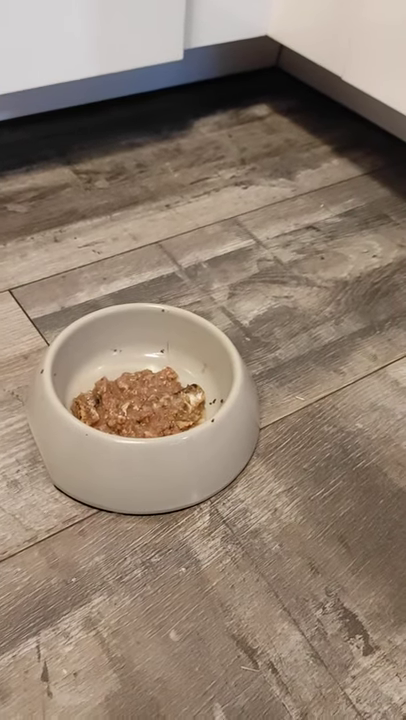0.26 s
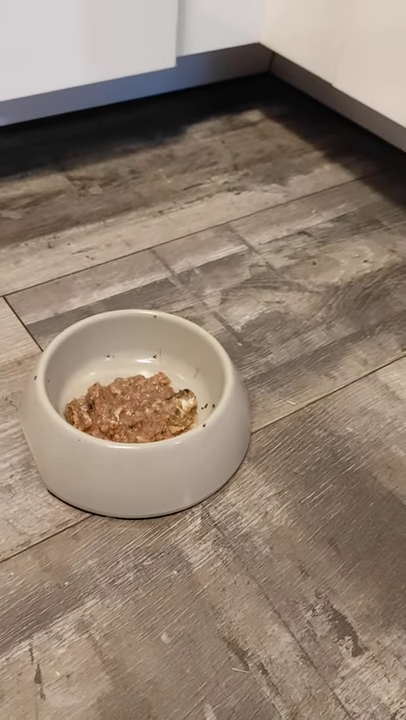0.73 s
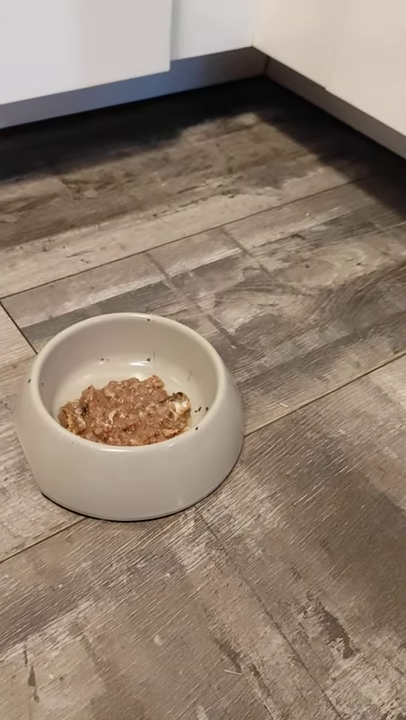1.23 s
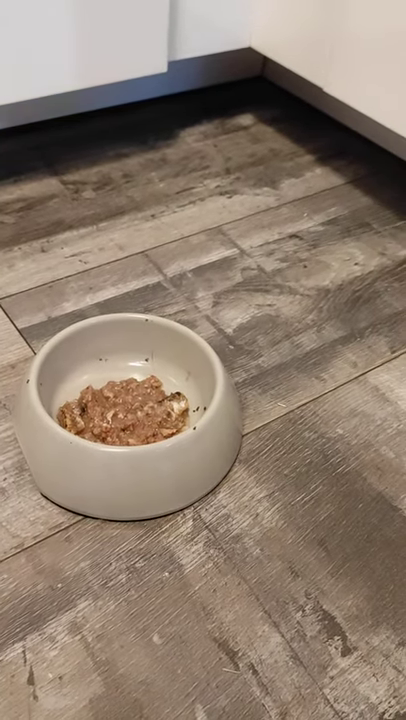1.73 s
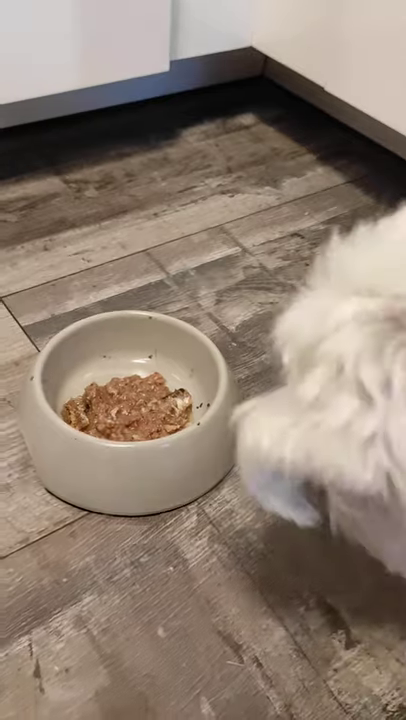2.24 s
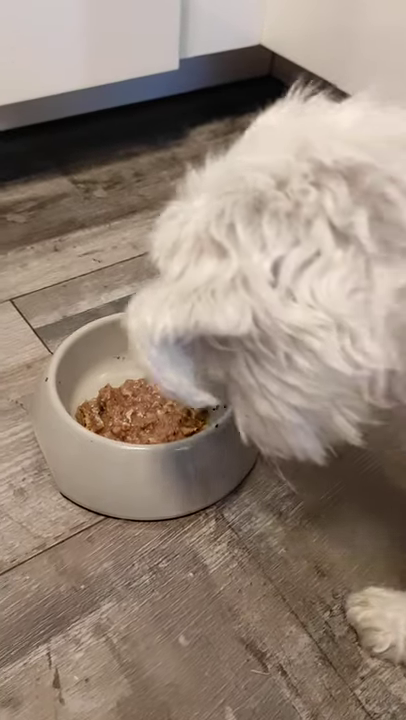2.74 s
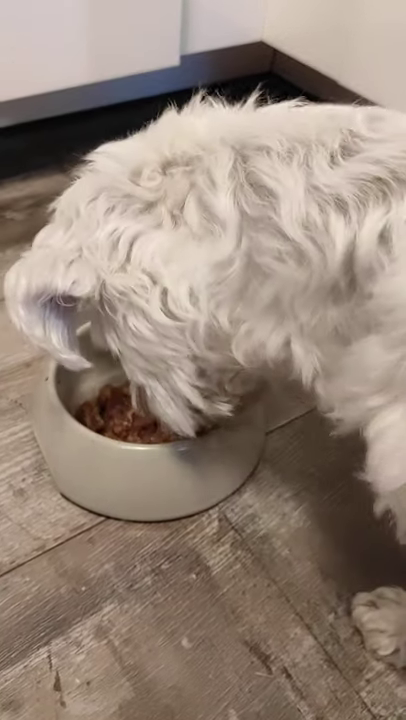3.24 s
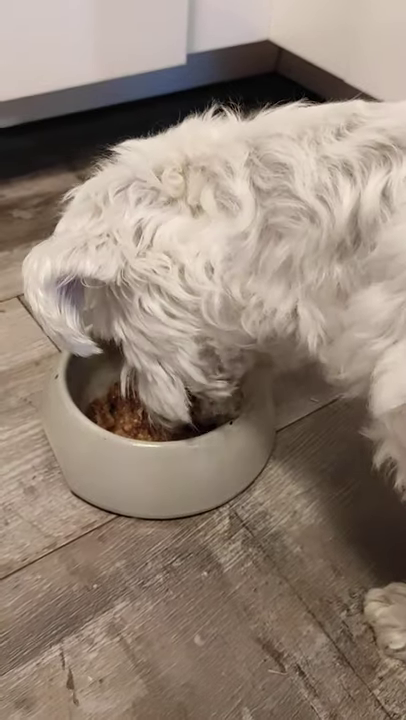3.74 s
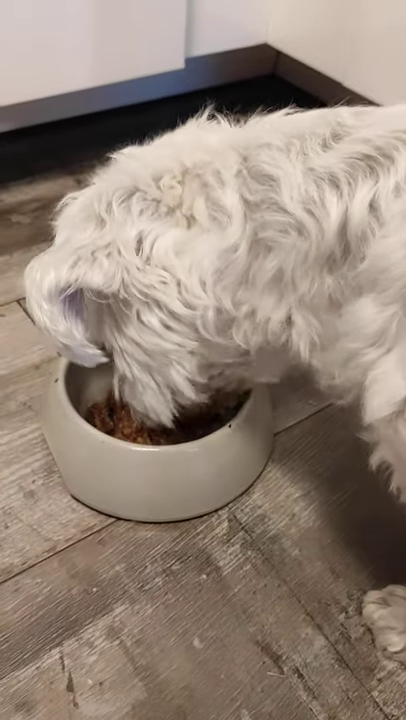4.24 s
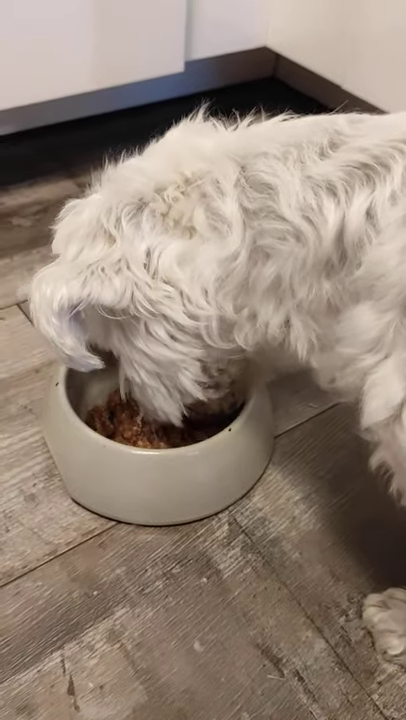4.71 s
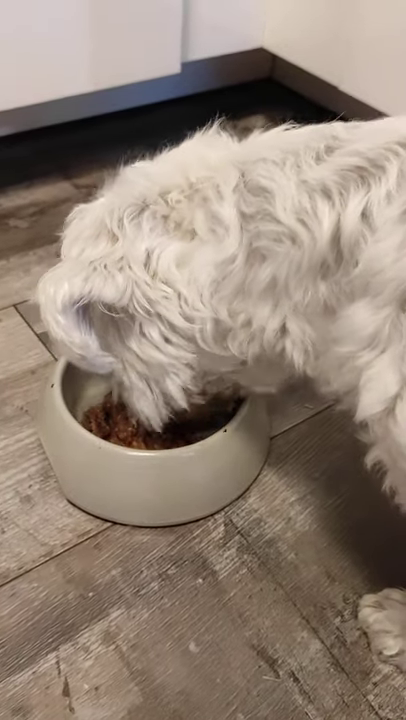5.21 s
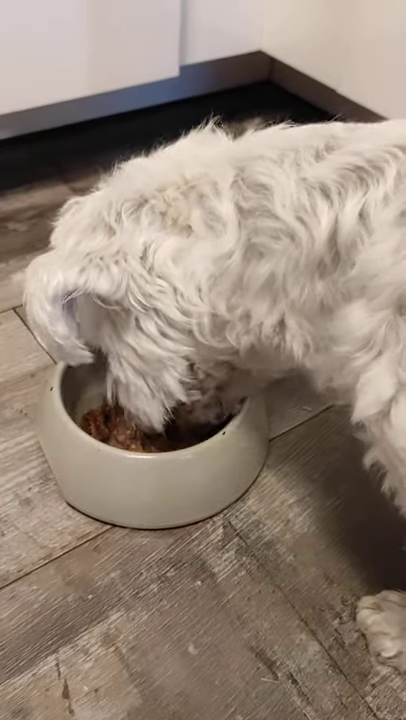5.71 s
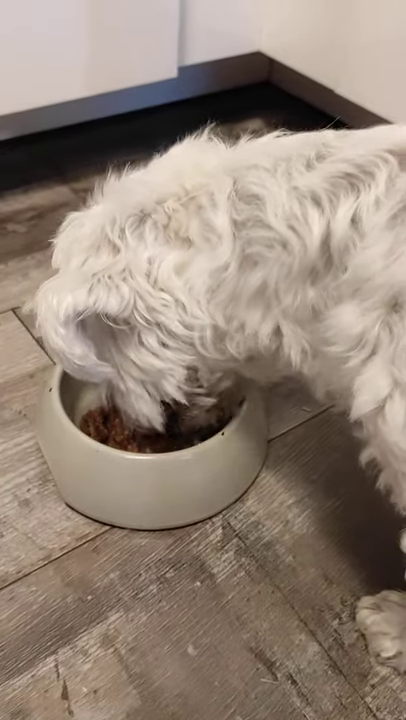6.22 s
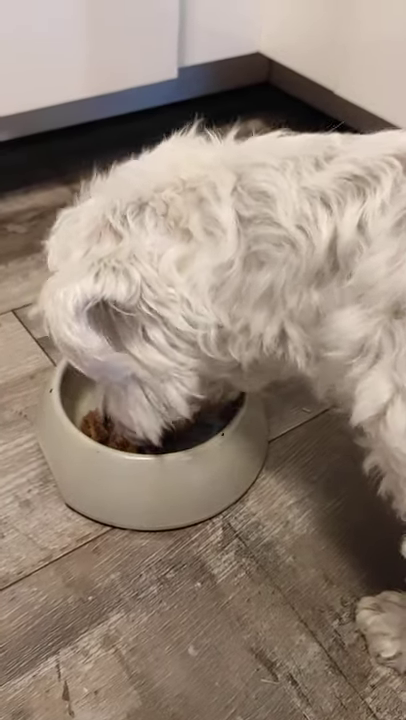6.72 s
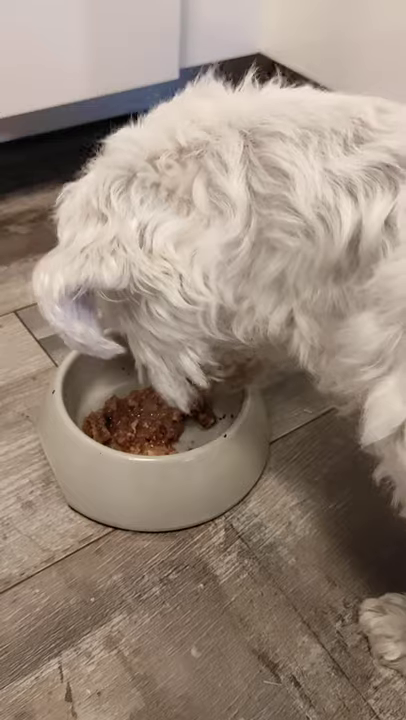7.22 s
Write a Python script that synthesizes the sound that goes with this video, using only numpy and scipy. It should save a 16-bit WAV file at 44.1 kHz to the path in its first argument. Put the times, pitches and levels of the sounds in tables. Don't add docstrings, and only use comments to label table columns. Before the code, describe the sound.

Bright claw ticks, some strong and some barely there, mix with brief gritty skids as a dog walks to its bowl, drifting from right toward left. A few soft nosing sounds and a first taste follow, then quieter, quick, irregular wet mouth clicks with little air pops and a low double bump late on. Quiet indoor hum, hard reflective room, handheld phone close to the muzzle.

```python
import sys
import numpy as np
from scipy import signal
from scipy.fft import rfft, irfft
from scipy.io import wavfile
from scipy.ndimage import uniform_filter1d

SR = 44100
rng = np.random.default_rng(int(sys.argv[2]) if len(sys.argv) > 2 else 0)


def wav_out(sig):
    wavfile.write(sys.argv[1], SR, np.round(np.clip(np.atleast_2d(sig).T, -1, 1) * 32767).astype(np.int16))


def rack_gain(trim_db):
    fader = np.asarray(trim_db, float)
    return 10 ** (fader / 20)


N = 328986
T = np.arange(N) / SR
HZ = np.maximum(np.arange(N // 2 + 1) * SR / N, 1)
SWELL_RANGE_DB = 38.5


def unit(x):
    return x / np.sqrt(np.mean(x ** 2))


def shape(points):
    hz, value = np.transpose(points)
    return np.interp(np.log(HZ), np.log(hz), value)


def peak(hz, width_hz):
    return 1 / np.sqrt(1 + ((HZ - hz ** 2 / HZ) / width_hz) ** 2)


def colour(x, gain):
    return irfft(rfft(x) * unit(gain), N)


def crackle(spread_db, size):
    strength = np.minimum(rng.exponential(size=N // size + 1), 5)
    gain = np.repeat(rack_gain(spread_db * strength), size)[:N]
    return unit(uniform_filter1d(gain, size=size // 2) * rng.standard_normal((2, N)))


def swells(events):
    level_db = []
    for s, db, swell_s, fade_s in events:
        distance = np.maximum((s - T) / max(swell_s, 0.002), (T - s) / max(fade_s, 0.002))
        level_db.append(db - SWELL_RANGE_DB * distance)
    return np.sum(rack_gain(level_db), axis=0)


def ticks(events, rise_s, layer_db):
    hold_stretch = 1.77
    out = np.zeros((3, 2, N))
    grain = crackle(2.2, size=36)
    for s, db, knock_db, body_db, pan_db, length_ms in events:
        first = int((s - rise_s) * SR)
        span = slice(first, first + 1500)
        age = T[span] - s + rise_s
        hold_s = hold_stretch * max(length_ms, 0.2) / 1000
        rise = np.minimum(age / rise_s, 1) ** 2
        fall = np.exp(-(np.maximum(age - rise_s, 0) / hold_s) ** 2)
        burst = rise * fall * grain[:, span]
        energy = np.sum(burst ** 2, axis=1, keepdims=True)
        burst /= np.sqrt(energy / (length_ms * SR / 1000))
        burst *= rack_gain(db + np.array([[pan_db], [-pan_db]]) / 2)
        shares = rack_gain(np.add(layer_db, [0, knock_db, body_db]))
        out[:, :, span] += shares[:, None, None] * burst
    return out


def voiced(layers, spectrum, knock_hz):
    top, knock, body = layers
    split_hz, knock_width_hz = 6000, 2060
    below = 1 / (1 + (HZ / split_hz) ** 8)
    tick = rack_gain(shape(spectrum))
    sharp = colour(top, tick * (1 - below)) + colour(body, tick * below)
    return sharp + colour(knock, peak(knock_hz, knock_width_hz) ** 2)


def pops(events, glide, attack_s):
    out = np.zeros(N)
    for s, db, hz, t60_s in events:
        span = slice(int(s * SR) + 1, int(s * SR) + SR // 4)
        age = T[span] - s
        turns = hz * age * (1 + glide * np.minimum(age / t60_s, 1))
        decay = rack_gain(db - 60 * age / t60_s)
        out[span] += decay * np.minimum(age / attack_s, 1) * np.sin(2 * np.pi * turns)
    return out * rack_gain([[3], [3]])


# loudest_s, peak_db, body_minus_top_db, rattle_ms
CLAW_TICKS = [(0.0401, -15.5, -6, 0.75), (0.0448, -42, 3, 0.83), (0.054, -21.5, -6, 1.15),
              (0.3408, -21.5, -16.5, 2.5), (0.376, -24, -13, 4.5), (0.607, -25.5, -8, 4.2),
              (0.8118, -21.5, -9, 3), (0.815, -27, -11, 2.3), (0.8424, -16, -9.5, 5.2),
              (0.999, -24.5, -12, 3.1), (1.246, -37.5, -12, 2.3), (1.264, -40.5, -6, 3.3),
              (1.3682, -19, -14.5, 1.5), (1.4689, -37.5, -4.5, 1.6), (1.5325, -32.5, -10, 2.5),
              (1.688, -33, -5, 1.87), (1.846, -26.5, -12, 2.5), (1.9927, -40, -4, 5),
              (2.016, -37, -13, 2.7), (2.0487, -23, -11, 5), (2.1585, -31, -20, 3.6),
              (2.6392, -27, -12.5, 2.3), (2.8632, -17.5, -22, 1.3), (2.901, -33.5, -9, 1.9),
              (3.1929, -27, -5.5, 2.9), (3.2105, -20, -12, 1.66), (3.583, -50, 3.5, 3.5),
              (3.6305, -38, -24, 2.4), (3.7611, -21, -13.5, 2.9), (3.932, -39, -24, 2.6)]
# time_s, left_minus_right_db
WALK_PAN = [
    (0.0, -2.5),
    (1.4, 2),
    (2.0, 4.5),
    (3.2, 2),
    (3.9, 8),
]


def claw_ticks():
    usual_db, knock_db, knock_loss_per_db = -28, -18, 0.42
    when_s, pan_db = np.transpose(WALK_PAN)
    events = []
    for s, db, body_db, rattle_ms in CLAW_TICKS:
        knock = knock_db - knock_loss_per_db * (db - usual_db)
        events.append((s, db, knock, body_db, np.interp(s, when_s, pan_db), rattle_ms))
    return ticks(events, rise_s=0.0012, layer_db=(-11, -3, -8))


# loudest_s, level_db, swell_s, fade_s, body_minus_top_db
SKIDS = [(0.038, -53, 0.0092, .012, -9), (0.02, -50, 0.15, 0.16, -5), (0.204, -43.5, 0.13, 0.12, -1),
         (0.335, -40, 0.01, 0.12, -8), (0.53, -34.5, 0.061, 0.18, -4.5), (0.6, -43.5, 0.14, 0.048, -1.5),
         (0.734, -49, 0.037, .025, 5), (1.06, -46.5, 0.058, 0.12, -4), (1.179, -37.5, 0.06, .03, 1),
         (1.368, -36.5, 0.021, 0.0065, 2), (1.866, -45.5, 0.035, 0.067, 1.5),
         (2.237, -45.5, 0.13, 0.0094, 1.5), (2.39, -32, .023, 0.058, -4.5), (2.657, -55, .012, .025, -11),
         (3.05, -51, 0.084, 0.12, -0.5), (3.58, -66.5, 0.28, 0.1, 4), (3.778, -45, .01, 0.03, -18)]


def claw_skids():
    top = swells([row[:4] for row in SKIDS])
    body = swells([(s, db + body_db, swell_s, fade_s) for s, db, swell_s, fade_s, body_db in SKIDS])
    level = rack_gain([-4, -14.5, -6])[:, None, None] * np.array([top, top, body])[:, None]
    fine, coarse = crackle(3.05, size=50), crackle(3.5, size=130)
    return level * np.array([fine, fine, coarse])


# freq_hz, density_db_per_hz
CLAW_SPECTRUM = [(1290, -48), (2200, -11), (3330, -5.5), (4000, -1.5), (4380, -1), (4960, 0), (6010, -5.5),
                 (8300, -5), (9970, -22.5), (11800, -30), (16000, -36)]


def feet():
    return voiced(claw_ticks() + claw_skids(), CLAW_SPECTRUM, knock_hz=1270)


# start_s, peak_db, pitch_hz, t60_s
BOARDS = [(0.377, -57, 726, 0.038), (0.811, -40, 1456, 0.022), (0.845, -45, 1370, 0.031),
          (2.051, -49.5, 1168, 0.028), (2.233, -50.5, 1050, 0.025), (2.373, -48, 900, 0.015),
          (2.641, -57, 730, 0.036), (2.862, -48.5, 1090, 0.019), (3.195, -50, 1064, 0.03),
          (3.214, -46, 746, 0.015), (3.762, -49.5, 880, 0.028), (3.934, -54.5, 530, 0.05)]


def floor_boards():
    return pops(BOARDS, glide=0.06, attack_s=0.00017)


# loudest_s, peak_db, cavity_minus_top_db, body_minus_top_db
SMACKS = [(4.1068, -46, -2, -3), (4.2857, -50, 7, -12), (4.4284, -37, -34, -8), (4.598, -46.5, 5, 0),
          (4.608, -46, 4, -5), (4.906, -38, -21, -25), (4.9458, -44.5, -8, -11), (4.9745, -44, -15, 5),
          (5.136, -48, 4, 5.5), (5.188, -48, 6, -20), (5.2003, -44, -2, -24), (5.415, -46, 1, -1.5),
          (5.4758, -44, -19, 6), (5.48, -44.5, 1, 6), (5.572, -33.5, -4.5, -36), (5.7507, -48, -18, 5.5),
          (5.881, -33.5, -10.5, 2.5), (5.917, -37, -9, -22), (5.9841, -40, -4, -29),
          (6.0159, -41.5, 1, -28), (6.156, -39.5, -24, -11), (6.2397, -47.5, 2, 1), (6.353, -41, -10, -40),
          (6.6269, -39.5, -18, -22), (6.6752, -30.5, -30, -44), (6.6813, -34, -5.5, -41),
          (6.714, -33, -29, -42), (6.8413, -48, 7, 1.5), (7.044, -41.5, -11, -23), (7.1801, -34.5, -15, 0)]
# loudest_s, peak_db
LICKS = [(4.085, -54), (4.1654, -55), (4.5027, -57), (4.528, -56), (4.5677, -57), (4.337, -56),
         (4.7425, -51), (4.8628, -56), (4.9655, -45.5), (4.9105, -47), (5.0664, -51.5), (5.235, -53.5),
         (6.4862, -62), (5.2697, -50.5), (5.2783, -52), (5.376, -58), (5.3926, -52), (5.512, -50),
         (5.542, -51), (5.817, -49.5), (5.848, -51), (6.006, -48), (6.1692, -48), (6.2865, -53),
         (6.516, -51), (6.526, -51), (6.6375, -50), (7.2725, -52), (6.9563, -52.5), (7.0809, -51)]
# loudest_s, peak_db
THREADS = [(4.232, -60), (4.581, -50), (4.88, -52), (4.8913, -47), (4.9554, -48), (5.222, -61),
           (5.248, -48), (5.558, -57), (5.73, -54), (5.868, -57), (6.3084, -57), (6.5017, -53),
           (6.6434, -49), (6.6564, -53), (6.9436, -61)]


def smacks():
    pan_db, lick_ms = 0.4, 2.6
    usual_db, usual_ms, doubling_db = -41.5, 1.21, 14
    events = []
    for s, db, cavity_db, body_db in SMACKS:
        tear_ms = usual_ms * 2 ** ((db - usual_db) / doubling_db)
        events.append((s, db, cavity_db, body_db, pan_db, tear_ms))
    events += [(s, db, -4, -6.5, pan_db, lick_ms) for s, db in LICKS]
    events += [(s, db, -8, -16, pan_db, lick_ms) for s, db in THREADS]
    return ticks(events, rise_s=0.001, layer_db=(-10, -7, -7))


# loudest_s, level_db, swell_s, fade_s
STROKES = [
    (4.22, -78, .3, 0.8),
    (4.87, -65.5, 0.079, 0.24),
    (5.1, -70.5, 0.11, 0.85),
    (5.56, -71.5, 0.36, 0.13),
    (5.8, -79, 0.11, 0.48),
    (6.3, -76, 0.27, 0.97),
    (6.63, -75, 0.027, 0.14),
    (6.91, -87, .2, 0.57),
    (7.18, -87, .5, .25),
]
# loudest_s, level_db, swell_s, fade_s
TASTES = [
    (2.55, -61, 0.15, 0.11),
    (2.615, -58.5, 0.075, 0.045),
    (3.587, -55, .006, 0.036),
    (3.935, -46.5, 0.0055, 0.038),
    (4.003, -60, .006, 0.036),
]


def squelch():
    tongue, muzzle = swells(STROKES), swells(TASTES)
    shares_db = [(-2.5, -5), (4.5, 3.5), (-12, -5)]
    layers = []
    for tongue_db, muzzle_db in shares_db:
        level = tongue * rack_gain(tongue_db) + muzzle * rack_gain(muzzle_db)
        layers.append(level * crackle(3.5, size=70))
    return np.array(layers)


# freq_hz, density_db_per_hz
WET_SPECTRUM = [(1650, -34), (2800, -46), (3830, -21), (4700, -23), (6020, -21.5), (7600, -4),
                (8610, -11.5), (11000, -42), (13400, -41), (16000, -61)]


def mouth():
    return voiced(smacks() + squelch(), WET_SPECTRUM, knock_hz=1850)


# start_s, peak_db, pitch_hz, t60_s
POCKETS = [(4.168, -59, 1110, 0.056), (4.521, -54.5, 1075, 0.047), (4.842, -60, 1085, 0.088),
           (4.934, -48, 495, 0.039), (4.945, -54, 485, 0.035), (5.134, -38.5, 1150, 0.0053),
           (5.231, -55.5, 552, 0.039), (5.897, -54.5, 484, 0.035), (5.935, -50, 533, 0.023),
           (6.178, -55, 900, 0.017), (6.413, -52.5, 490, 0.031), (6.993, -48, 544, 0.043),
           (7.01, -51, 586, 0.022),
           (4.0008, -60, 3720, 0.024), (4.2882, -56, 2010, 0.015), (4.339, -51, 2020, 0.014),
                 (4.9462, -56, 1800, 0.031), (5.222, -54, 1830, 0.019), (5.2784, -59.5, 2200, 0.022),
                 (5.558, -58, 2210, 0.041), (6.2404, -50, 5180, 0.0091), (6.353, -50, 2240, 0.017),
                 (6.6769, -51, 2310, 0.015), (6.8409, -54, 2230, 0.014)]


def air_pockets():
    return pops(POCKETS, glide=0.06, attack_s=0.00017)


# start_s, peak_db, pitch_hz, t60_s
BOWL_ROCKS = [
    (6.995, -38, 223, 0.054),
    (7.005, -33, 169, 0.049),
]


def bowl_thud():
    return pops(BOWL_ROCKS, glide=0.01, attack_s=0.0089)


def kitchen(dry, near_db, room_db):
    near_t60_s, room_t60_s, tail_top_hz = 0.035, 0.31, 8060
    age = T[:SR // 2]
    near = rng.standard_normal((2, len(age))) * rack_gain(-60 * age / near_t60_s) * (age > 0.001)
    near *= crackle(2.5, size=16)[:, :len(age)]
    tail = rng.standard_normal((2, len(age))) * rack_gain(-60 * age / room_t60_s)
    tail *= np.clip(age / 0.01, 0, 1)
    tail = signal.sosfilt(signal.butter(2, tail_top_hz, fs=SR, output="sos"), tail)
    echoes = rack_gain(near_db) * unit(near) + rack_gain(room_db) * unit(tail)
    return dry + signal.fftconvolve(dry, echoes / np.sqrt(len(age)), axes=1)[:, :N]


# freq_hz, density_db_per_hz
HUSH = [(12, -25), (20, 2.5), (65, -11), (172, 0.5), (262, 3), (399, -7), (698, -11), (1710, -13),
        (3250, -23.5), (4940, -31), (7520, -32), (8890, -35.5), (10500, -44), (12100, -38.5), (16000, -65)]
# freq_hz, width_hz, level_db
FRIDGE_MODES = [(116.4, 14, -70.5), (165.2, 16.5, -64.5), (201, 25, -67.5), (267.2, 11, -63.5),
                (315.7, 60, -66), (1090, 100, -75), (1710, 88, -77)]
# freq_hz, correlation
LIKENESS = [(30, 0.063), (130, 1), (290, 0.71), (640, 0.32), (1400, 0.004)]


def room_tone():
    like = np.clip(shape(LIKENESS), 0, 1)
    mid, side = rfft(rng.standard_normal((2, N)))
    hush = (unit(rack_gain(shape(HUSH))) * rack_gain(-59.5)) ** 2
    drone = sum((unit(peak(hz, width_hz) ** 2) * rack_gain(db)) ** 2 for hz, width_hz, db in FRIDGE_MODES)
    pair = np.sqrt(1 + like) * mid + np.outer([1, -1], np.sqrt(1 - like) * side)
    return irfft(np.sqrt(hush + drone) * pair, N)


def scene():
    hollow = floor_boards() + air_pockets() + bowl_thud()
    far = kitchen(feet() + rack_gain(1.5) * hollow, near_db=-8, room_db=-7.5)
    close = kitchen(mouth(), near_db=-8, room_db=-8.5)
    return far + close + 0.39 * hollow + room_tone()


def roll_off(x):
    return signal.sosfilt(signal.butter(12, 15800, fs=SR, output="sos"), x)


# freq_hz, left_minus_right_db
PORT_TILT = [(60, 4.5), (130, 4.5), (280, 8.2), (700, 3.5), (2000, 0.5), (5200, -2.5), (7300, -2.5),
             (9000, 1.5)]


def record(dry):
    width_hz, top_hz, ceiling = 1400, 15800, 0.3
    ports = []
    for port_hz, port_db in [(8700, 9), (7250, 9)]:
        ports.append(1 + (rack_gain(port_db) - 1) / (1 + 1j * (HZ - port_hz ** 2 / HZ) / width_hz))
    tilt = rack_gain(np.outer([0.5, -0.5], shape(PORT_TILT)))
    heard = irfft(rfft(dry) * np.array(ports) * tilt * (HZ < top_hz), N)
    rounded = ceiling * np.tanh(heard / ceiling)
    return roll_off(rounded)


dry = scene()
out = record(dry)
wav_out(out)
```